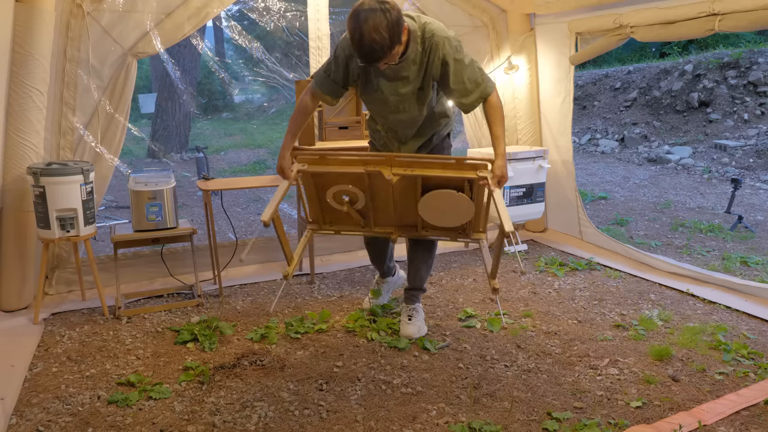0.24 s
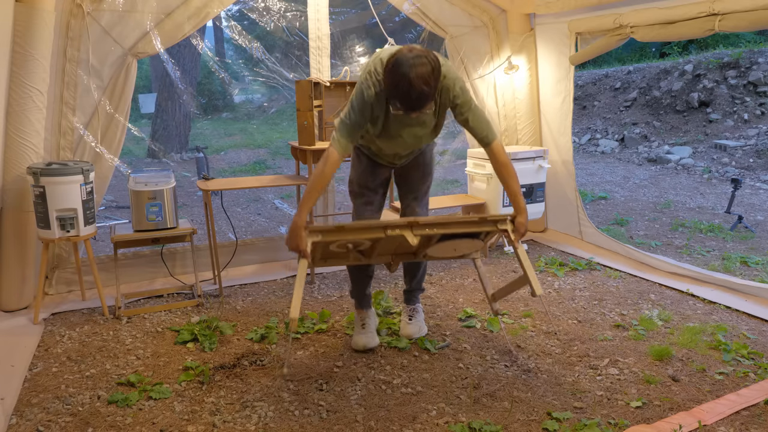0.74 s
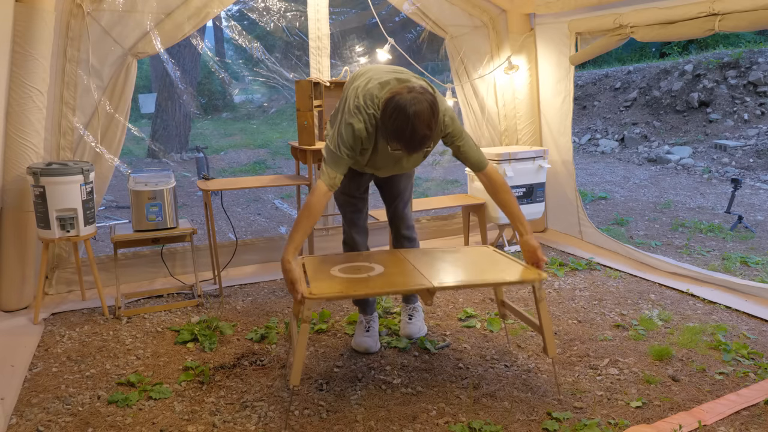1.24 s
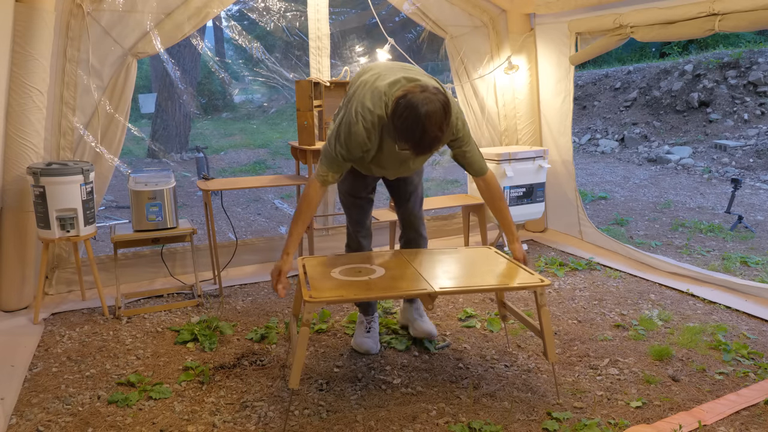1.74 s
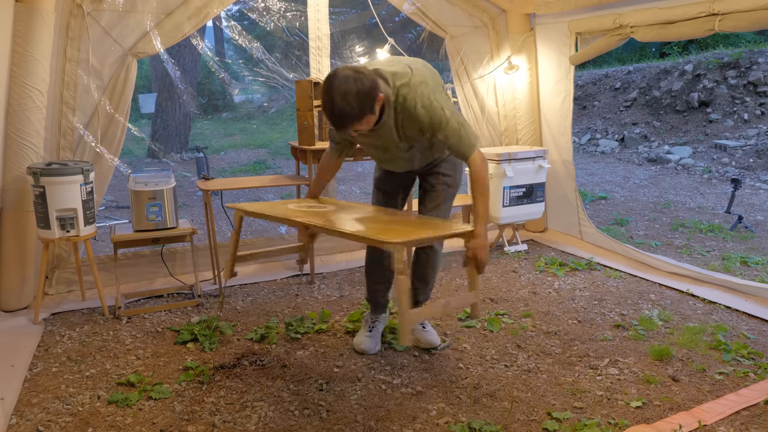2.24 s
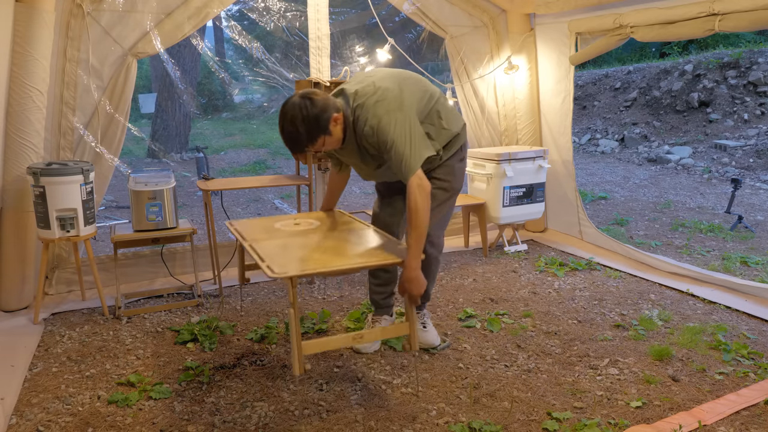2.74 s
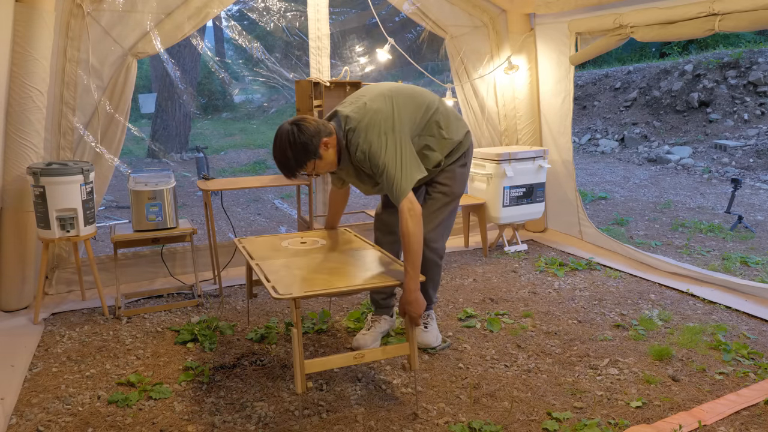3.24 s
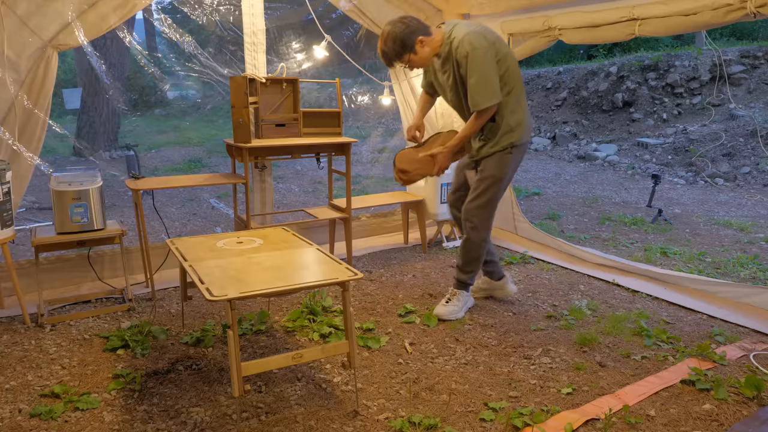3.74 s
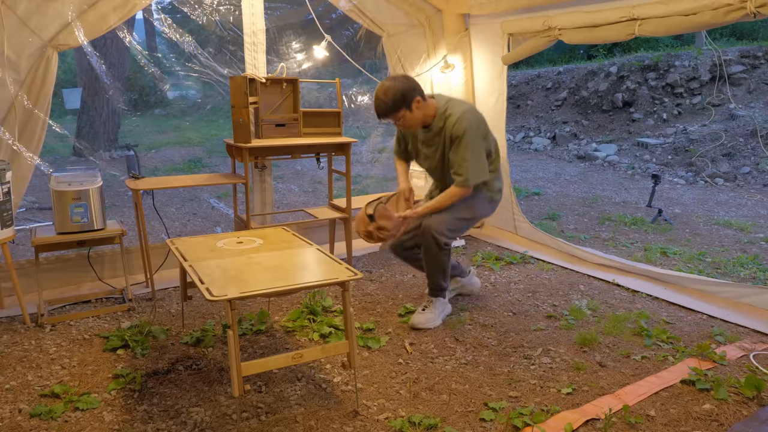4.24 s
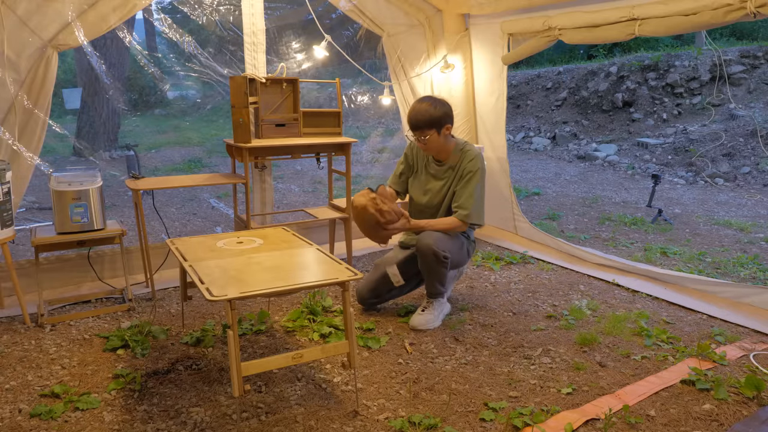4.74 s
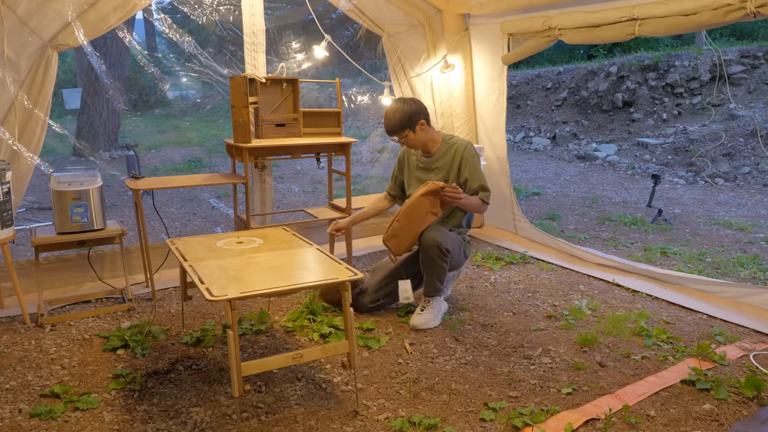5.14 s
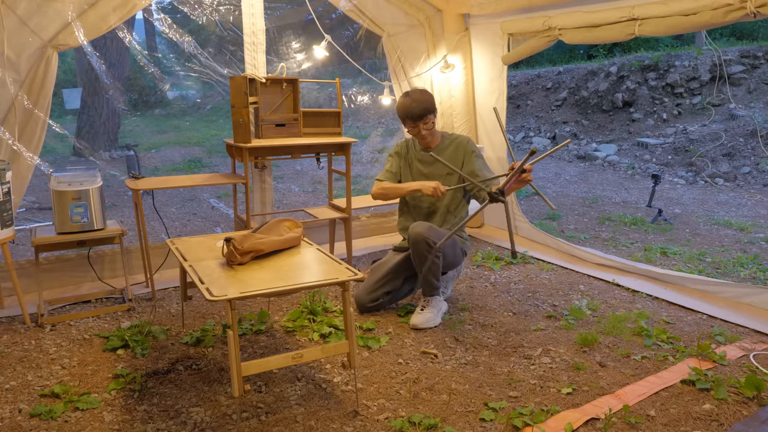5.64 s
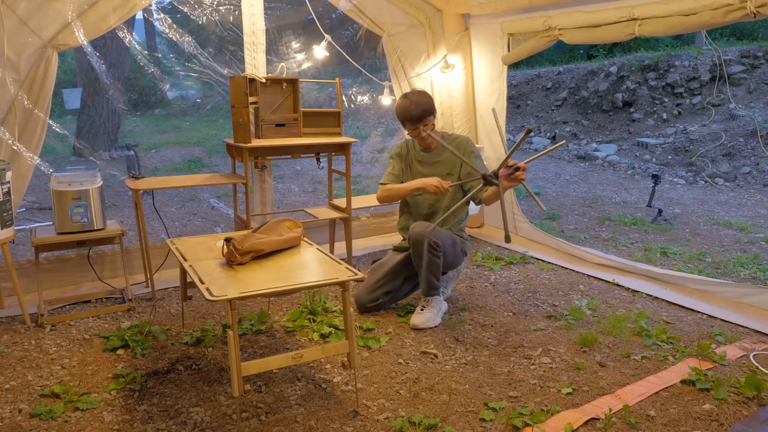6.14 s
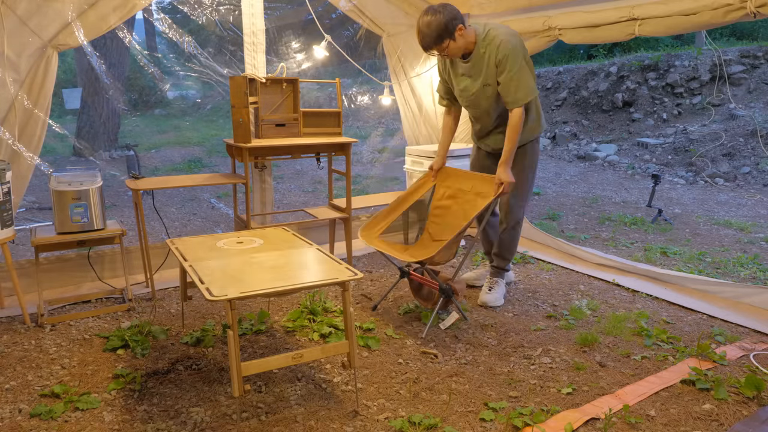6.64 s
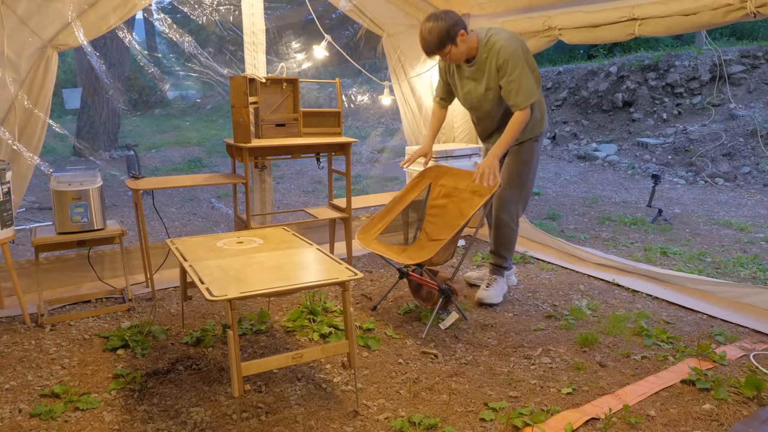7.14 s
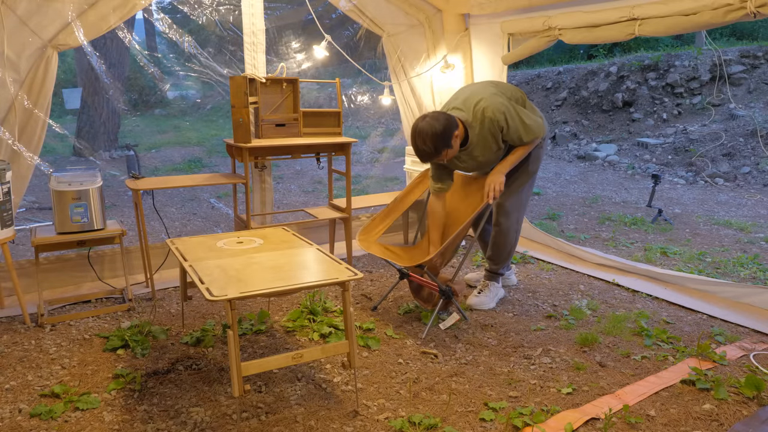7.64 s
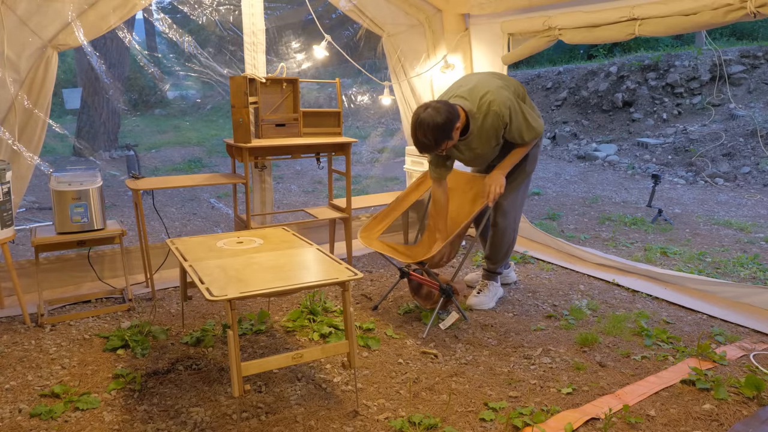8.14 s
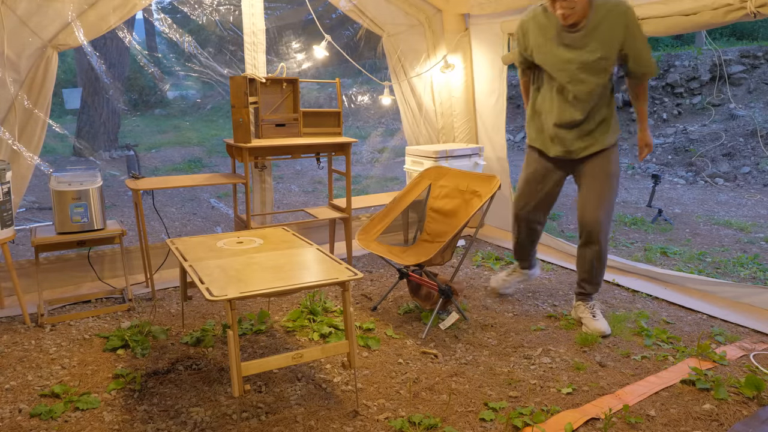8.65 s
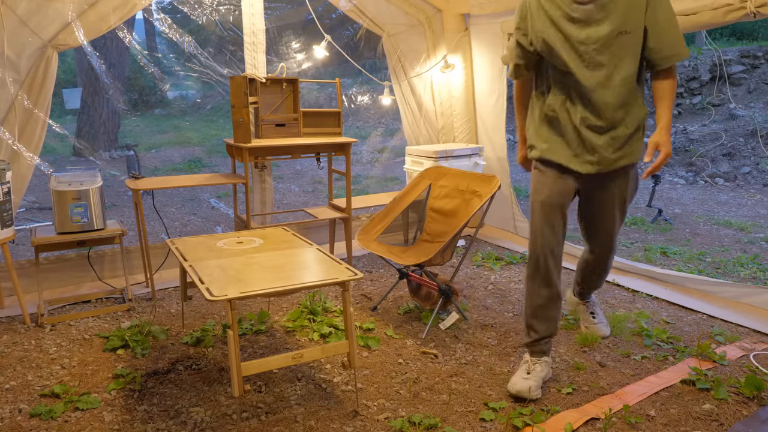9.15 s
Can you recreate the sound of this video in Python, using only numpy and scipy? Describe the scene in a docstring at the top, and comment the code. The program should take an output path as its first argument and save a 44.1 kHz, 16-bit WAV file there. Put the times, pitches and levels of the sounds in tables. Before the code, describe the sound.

Wooden folding table clacks and knocks onto gravel, then a zipper rasps, metal poles clink and snap, and a taut fabric seat gets two thumping pats.

```python
"""A folding wooden table is opened and set down on gravel inside a canvas tent: knocks ring its modes.
A bag is unzipped, tooth by tooth; metal chair poles clink and snap home; the taut seat is patted twice.
A shoe crunches into gravel. Cloth and gravel rustle as shaped noise with the movements, over low thumps.
Behind it lies the steady wash of the outdoors; the canvas adds a short, dull echo to the struck objects."""
import sys
import numpy as np
from scipy import signal
from scipy.io import wavfile

SR = 44100
rng = np.random.default_rng(int(sys.argv[2]) if len(sys.argv) > 2 else 0)


def pcm_store(signal):
    """Save signal as 16-bit PCM."""
    levels = np.round(np.clip(np.atleast_2d(signal), -1, 1) * 32767)
    wavfile.write(sys.argv[1], SR, levels.astype(np.int16).T)


N = 414539

# Spectrum of gravel underfoot. Each row: pitch in Hz, relative density in dB per Hz.
GRAVEL_SPECTRUM = [(50, -44), (120, 1), (250, 0), (500, 3.5), (1000, -2.5), (2000, -15.5), (4000, -39.5)]


def amp(db):
    """Decibels to gain."""
    return 10 ** (np.asarray(db) / 20)


def rms_one(x):
    """Scaled to unit power."""
    return x / np.sqrt(np.mean(x ** 2) + 1e-20)


def in_time(rows):
    """Columns of a curve at every sample."""
    s, *columns = np.transpose(rows)
    return [np.interp(np.arange(N) / SR, s, c) for c in columns]


def at_hz(points, hz):
    """A spectrum or decay curve read on a log-frequency axis."""
    pitches, values = np.transpose(points)
    return np.interp(np.log(hz), np.log(pitches), values)


def drift(rate_hz):
    """Slow chance of spread 1: noise through two equal poles at the given rate."""
    step = 40   # samples between drawn points
    pole = np.exp(-2 * np.pi * rate_hz * step / SR)
    raw = rng.standard_normal(N // step + 2002)
    slow = signal.lfilter([1], [1, -2 * pole, pole * pole], raw)[2000:]
    return np.interp(np.arange(N) / step, np.arange(len(slow)), rms_one(slow))


def bandpass(x, order, low_hz, high_hz):
    """Butterworth band-pass."""
    return signal.sosfilt(signal.butter(order, [low_hz, high_hz], "band", fs=SR, output="sos"), x)


def split(source):
    """Half-octave bands (centre Hz, signal); neighbours come from different rows of the source."""
    edges_hz = 25 * 2 ** np.arange(0, 9.6, .5)
    return [(np.sqrt(low * high), bandpass(source[k % 2], 2, low, high))
            for k, (low, high) in enumerate(zip(edges_hz, edges_hz[1:]))]


def colour(bands, spectrum, patchy_db):
    """Bands weighted by a spectrum, each flickering on its own; rms 1."""
    return rms_one(sum(amp(at_hz(spectrum, hz) + patchy_db * drift(20.6)) * band for hz, band in bands))


def grains(per_s, spread_db, hiss):
    """Two rows of random clicks of uneven size on a bed of hiss."""
    sizes = amp(spread_db * np.minimum(rng.exponential(1, (2, N)), 5))
    sizes = sizes * rng.choice([-1, 1], (2, N))
    clicks = sizes * (rng.random((2, N)) < per_s / SR)
    return rms_one(clicks) + hiss * rng.standard_normal((2, N))


def swells(rows, idle_db):
    """Each gesture climbs 20 dB in its swell time and falls 20 dB in its fade time, over an idle level."""
    t, out = np.arange(N) / SR, np.full(N, amp(idle_db))
    for s, swell, fade, db in rows:
        at = slice(max(int((s - 3 * swell) * SR), 0), int((s + 3 * fade) * SR))
        climbing = (s - t[at]) / max(swell, .002)
        falling = (t[at] - s) / max(fade, .002)
        out[at] += amp(db - 20 * np.maximum(climbing, falling))
    return out


def rustle(effort, per_s, spectrum, lumpy_db, lumps_per_s):
    """Grains on hiss, as loud as the movement."""
    lumps = amp(lumpy_db * drift(lumps_per_s))
    bands = split(grains(per_s, spread_db=3.0, hiss=1.0))
    return effort * lumps * colour(bands, spectrum, patchy_db=2.5)


def touch_db(hz, hardness, favoured_hz, rebound):
    """Hardness tilts the spectrum about 1 kHz, the spot struck favours its pitch, rebounds are duller."""
    favour_db, favour_octaves = 7.5, 0.42
    duller_db, keeps_hz = 1, 497   # each rebound loses this much per octave above this pitch
    tilt = hardness * np.log2(hz / 1000)
    favour = favour_db * np.exp(-.5 * (np.log2(hz / favoured_hz) / favour_octaves) ** 2)
    dulling = rebound * duller_db * np.maximum(np.log2(hz / keeps_hz), 0)
    return tilt + favour - dulling


def blows(events, modes, crack, noise, ring_db, crack_db, rise_ms, swell_cycles, spread, length, rebound_ms):
    """Each touch rings slightly detuned modes and a crack of noise dying band by band; blows may rebound."""
    # How a crack dies, to be scaled by length. Each row: pitch in Hz, 60 dB decay time in seconds.
    crack_t60 = [(100, 0.17), (500, 0.084), (2000, 0.1), (10000, 0.17)]
    first_touch_db, first_touch_ms = 2, 2.6   # extra level at the start of a crack, and its decay time
    longer_per_db = 0.0027   # the crack of a stronger blow lasts slightly longer (share per dB)
    most_touches, faintest_db = 6, 24   # rebounds stop once this much has been lost
    t = np.arange(SR // 6) / SR
    out = np.zeros(N + SR)
    hz, level_db, t60 = np.transpose(modes)
    centres, bands = noise
    luck = rng.standard_normal((len(events), most_touches, 3, len(modes)))
    chance = rng.random((len(events), 2, most_touches))
    first_touch = 1 + amp(first_touch_db) * np.exp(-1000 * t / first_touch_ms)
    end = np.minimum(1, 4 * (1 - t / t[-1]))   # fades out over the last quarter

    def rise(pitch_hz):
        """Low pitches take longer to build up, by a part of a cycle."""
        rise_s = rise_ms / 1000 + swell_cycles / pitch_hz
        return end * (1 - np.exp(-t / rise_s[:, None]))

    ringing = rise(hz) * amp(-60 * t / t60[:, None])
    cracking = rise(centres) * first_touch
    for (s, db, hardness, favoured_hz, loss_db), touches, (gaps, picks) in zip(events, luck, chance):
        crack_s = length * np.exp(longer_per_db * db) * at_hz(crack_t60, centres)
        dying = cracking * amp(-60 * t / crack_s[:, None])
        for k, (strength, detune, phase) in enumerate(touches):
            lost_db = k * abs(loss_db)
            if lost_db > faintest_db:
                break
            force_db = db - lost_db
            pitches = hz * (1 + spread * detune)
            swing = np.sin(2 * np.pi * pitches[:, None] * t + 2 * phase[:, None])
            mode_db = level_db + touch_db(hz, hardness, favoured_hz, k) + 2 * strength
            ring = amp(force_db + ring_db + mode_db) @ (ringing * swing)
            band_db = at_hz(crack, centres) + touch_db(centres, hardness, favoured_hz, k)
            pick = int(picks[k] * (N - len(t)))   # a random stretch of the noise
            burst = amp(force_db + crack_db + band_db) @ (dying * bands[:, pick:pick + len(t)])
            at = int((s + rebound_ms / 1000 * np.sum(.8 + .4 * gaps[:k])) * SR)
            out[at:at + len(t)] += ring + burst
    return out[:N]


def outdoors_wash():
    """Steady wash of the outdoors: noise whose bands flicker a little."""
    # Each row: pitch in Hz, relative density in dB per Hz.
    spectrum = [(15, -36), (25, -7), (394, 1.5), (1230, 2.5), (3520, -11.5), (8140, -15.5), (10400, -82),
                (14000, -57), (16000, -34)]
    return amp(-50) * colour(split(rng.standard_normal((2, N))), spectrum, patchy_db=2.0)


def ground_thumps():
    """Dull rumble of weight shifting on the ground: low noise in swells."""
    # Each row: loudest moment in seconds, swell in seconds, fade in seconds, level in dB.
    shifts = [(0.68, .3, .4, -60), (3.01, 0.13, 0.44, -54), (4.3, 0.46, 0.2, -54), (5.33, .4, .3, -55),
              (9.4, 0.6, .1, -44.5)]
    rumble = bandpass(rng.standard_normal(N), 2, 30, 110)
    return swells(shifts, idle_db=-63.5) * rms_one(rumble)


def gravel_scuffs():
    """Shoes, knees and table legs shifting in the gravel: sparse grains on hiss."""
    # Each row: loudest moment in seconds, swell in seconds, fade in seconds, level in dB.
    scuffs = [(0.32, .05, 0.13, -46), (0.9, .4, 0.35, -43), (1.45, .04, 0.19, -48),
              (1.62, 0.077, 0.24, -52), (1.89, .08, 0.086, -46), (2.37, 0.18, 0.074, -51),
              (2.59, .2, 0.4, -50.5), (3.02, 0.11, 0.18, -39), (3.32, 0.028, 0.054, -50),
              (3.38, 0.018, 0.038, -44), (3.69, 0.087, 0.21, -40), (4.02, 0.067, 0.67, -43),
              (4.78, 0.11, .1, -56), (5.24, 0.11, 0.074, -35), (5.5, 0.037, 0.068, -58), (7.7, 1, .4, -55),
              (9.156, 0.033, .18, -38.5)]
    return rustle(swells(scuffs, idle_db=-54.5), 300, GRAVEL_SPECTRUM, lumpy_db=3.5, lumps_per_s=5.1)


def cloth_rubs():
    """Clothes and canvas brushing: dense grains on hiss."""
    # Each row: loudest moment in seconds, swell in seconds, fade in seconds, level in dB.
    rubs = [(0.45, 0.079, 0.34, -48), (0.66, 0.072, 0.28, -48.5), (0.9, 0.28, 0.45, -49),
            (1.36, .12, 0.089, -41), (1.5, 0.051, 0.077, -34.5), (1.658, 0.042, 0.078, -35.5),
            (1.88, 0.091, 0.11, -44), (2.35, 0.21, 0.22, -48.5), (2.58, 0.12, 0.11, -54),
            (2.85, 0.062, 0.17, -50), (3.02, 0.12, 0.15, -40), (3.39, 0.092, 0.079, -51),
            (3.62, 0.023, 0.18, -53), (3.9, 0.18, .3, -37), (4.27, 0.11, 0.088, -45),
            (4.47, .15, 0.11, -46.5), (4.78, 0.17, 0.11, -43), (5.09, 0.15, 0.17, -43),
            (5.34, .15, 0.078, -29.5), (5.818, .02, .05, -52), (6.05, 0.12, 0.15, -50),
            (6.85, 0.13, 0.046, -53), (7.05, .3, 0.25, -58), (7.35, .04, 0.15, -53),
            (7.72, 0.11, 0.13, -44), (7.89, 0.031, 0.054, -44), (8.26, 0.14, 0.13, -49),
            (8.4, 0.088, 0.017, -38), (8.7, 0.3, 0.19, -55), (9.15, 0.12, 0.28, -45), (9.4, 0.052, .1, -51)]
    # Each row: pitch in Hz, relative density in dB per Hz.
    spectrum = [(470, -29), (800, -6.5), (1150, -6), (1370, -10.5), (1810, -15.5), (2130, -2.5),
                (2440, -12), (12800, -22), (16000, -30.5)]
    return rustle(swells(rubs, idle_db=-67), 1500, spectrum, lumpy_db=1.0, lumps_per_s=9.1)


def shoe_crunch(noise):
    """A shoe crunching into gravel: briefly ringing stones and a short crack of noise."""
    # Each row: start in seconds, strength in dB, hardness in dB per octave, favoured pitch in Hz,
    # loss per rebound in dB.
    crunches = [(9.11, -27, -2, 420, 7), (9.148, -20.5, 2.5, 430, 2.5), (9.208, -20.5, 1.5, 465, 4)]
    # Ringing of the stones. Each row: pitch in Hz, relative level in dB, 60 dB decay time in seconds.
    stones = [(336, 4, .03), (600, -10, 0.027), (1023, 10, 0.027), (1510, -12, .02)]
    return blows(crunches, stones, GRAVEL_SPECTRUM, noise, ring_db=-15, crack_db=4, rise_ms=0.45,
                 swell_cycles=0.36, spread=0.085, length=0.21, rebound_ms=14)


def seat_squeak():
    """The seat fabric springing back: a fluttering tone that slides down and settles."""
    # Each row: loudest moment in seconds, swell in seconds, fade in seconds, level in dB.
    springing = [(7.905, .045, .07, -33)]
    loudest_hz, sag_hz_per_s = 1950, 20000   # pitch at the loudest moment, and its slide
    settles_hz, highest_hz = 1780, 2500   # limits of the slide, before the pitch flutter
    since_loudest = np.arange(N) / SR - springing[0][0]
    hz = np.clip(loudest_hz - sag_hz_per_s * since_loudest, settles_hz, highest_hz)
    level = swells(springing, idle_db=-150) * amp(4.5 * drift(170))
    fluttering_hz = hz * (1 + 0.061 * drift(140))
    return level * np.sin(2 * np.pi * np.cumsum(fluttering_hz) / SR)


def bag_zipper(uneven_db, weak_db):
    """The slider strikes two rows of teeth in turn; pulled slowly, it stutters and one row sounds weaker."""
    # The pull on the slider. Each row: time in seconds, teeth per second, relative level in dB.
    pull = [(3.66, 327, -43), (3.72, 300, -28), (3.76, 370, -24), (3.80, 350, -26.5), (3.856, 680, -27.5),
            (3.9, 700, -23), (3.93, 760, -33), (3.96, 810, -24.5), (4.02, 890, -36)]
    # Colour of the ticks. Each row: pitch in Hz, gain in dB.
    tick_colour = [(100, 1), (200, 9.5), (400, 18), (800, -2), (1400, -12), (2400, -8.5), (3500, -14),
                   (6000, -21), (15000, -26.5)]
    even_teeth_per_s = 560   # at this speed and above there is no stutter
    slow_jitter, fast_jitter = .2, .01   # share of the speed
    teeth, pull_db = in_time(pull)
    t = np.arange(N) / SR
    slowness = np.clip(2 * (1 - teeth / even_teeth_per_s), 0, 1)
    speed = teeth * (1 + (fast_jitter + slow_jitter * slowness) * drift(60))
    tooth = np.floor(np.cumsum(speed) / SR)
    tick_db = uneven_db * drift(97) - weak_db * slowness * (tooth % 2)
    ticks = np.diff(tooth, prepend=0) * np.sqrt(SR / even_teeth_per_s) * amp(tick_db)
    ticks = ticks * amp(pull_db) * (t > pull[0][0]) * (t < pull[-1][0])
    bands = split([ticks + 1e-18, ticks + 1e-18])
    # neighbouring bands have opposite signs
    return sum(amp(at_hz(tick_colour, hz)) * band * (-1) ** k for k, (hz, band) in enumerate(bands))


def seat_pats(noise):
    """Hands on the taut seat and the bag: low fabric modes and a soft crack."""
    # Each row: start in seconds, strength in dB, hardness in dB per octave, favoured pitch in Hz,
    # loss per rebound in dB (sign ignored).
    pats = [(4.004, -24, 1.5, 376.6, 3), (4.035, -23, 1.5, 823, 5), (4.143, -25, 0, 418, 33),
            (4.204, -31, 0, 646, -4), (4.251, -19.5, 3.5, 400, 3), (4.358, -31, 0.5, 900, 30),
            (4.452, -27, 3, 523, 8), (4.535, -26, 0.5, 781, 30), (6.707, -35, 1, 294, 3),
            (7.182, -35, -0.5, 848, 30), (7.659, -10, 2.5, 790, 33), (7.664, 0, 3, 240, 8),
            (7.865, -34.5, 4.5, 900, 9), (7.918, -35, 1, 260, 7), (8.086, -12.5, 5, 850, 28),
            (8.091, -2.5, 1, 290, 5), (8.168, -33.5, 5.5, 1430, 4), (8.651, -44, 9.5, 388, 1)]
    # Ringing of the seat. Each row: pitch in Hz, relative level in dB, 60 dB decay time in seconds.
    seat = [(135, -5, .11), (178, -4, .11), (262, 0, .11), (355, -8, .09), (560, -8, .08), (655, -7, .08),
            (760, -9, .07), (1005, -11, .06), (1340, -14, .06)]
    # Crack of the contact. Each row: pitch in Hz, relative density in dB per Hz.
    crack = [(29, -46), (50, 0), (285, 0), (449, -2.5), (941, -4.5), (1630, -13), (2820, -19.5),
             (3940, -22.5), (5250, -23.5), (15000, -47)]
    return blows(pats, seat, crack, noise, ring_db=-16, crack_db=10.0, rise_ms=0.92,
                 swell_cycles=0.2, spread=0.046, length=0.52, rebound_ms=12)


def pole_snap(noise):
    """A pole snapping home: its socket rings under a bright crack."""
    # Each row: start in seconds, strength in dB, hardness in dB per octave, favoured pitch in Hz,
    # loss per rebound in dB.
    snaps = [(6.085, -5, 0, 2500, 9)]
    # Ringing of the socket. Each row: pitch in Hz, relative level in dB, 60 dB decay time in seconds.
    socket = [(2000, -2, .03), (2850, -3, .035), (3060, 0, 0.04), (3420, -3, .03), (4860, -12, .03),
              (5700, -4, 0.04), (7400, -12, .03), (10100, -8, 0.06), (12700, -8, .03)]
    # Crack of the contact. Each row: pitch in Hz, relative density in dB per Hz.
    crack = [(500, -17), (1000, -10), (2000, -15), (2450, -15), (3100, -9), (4000, -20), (5600, -10.5),
             (10000, -19), (15000, -19)]
    return blows(snaps, socket, crack, noise, ring_db=-20.5, crack_db=5, rise_ms=0.75,
                 swell_cycles=0.33, spread=0.025, length=0.35, rebound_ms=8)


def pole_clinks(noise):
    """Metal poles touching: high modes and a crack of noise, often rebounding."""
    # Each row: start in seconds, strength in dB, hardness in dB per octave, favoured pitch in Hz,
    # loss per rebound in dB (sign ignored).
    clinks = [(4.0736, -29.5, -1.5, 3410, 30), (4.144, -32, 0.5, 5200, 32), (4.2328, -31, 2, 5240, 6),
              (4.4543, -31, 0, 4800, 20), (4.4894, -38.5, 1.5, 15700, 8), (4.5251, -31, -0.5, 1590, 30),
              (4.7102, -26.5, -3, 4670, 1), (5.1063, -13, -3, 1870, 7), (5.1292, -19.5, 1, 3460, 22),
              (5.2056, -22, -3.5, 5370, 5), (5.2334, -11, 0, 1580, 20), (5.242, -7.5, -1, 4200, 3.5),
              (5.2624, -12.5, 1, 5170, 22), (5.3186, -20, -5, 4380, 20), (5.3258, -12.5, -0.5, 4670, 1),
              (5.4094, -27.5, -2.5, 4380, 20), (5.4919, -27.5, -3, 4300, 4), (5.5358, -28.5, -3, 2060, 4),
              (5.9045, -41, 3.5, 3300, 18), (6.0087, -43.5, 1.5, 6850, 15), (6.0402, -37, 1.5, 7090, -1)]
    # Ringing of the poles. Each row: pitch in Hz, relative level in dB, 60 dB decay time in seconds.
    poles = [(3410, 0, 0.032), (4610, 3, 0.055), (4854, 9.5, 0.027), (5100, 8.5, 0.049), (6560, -16, .04),
             (7700, -3, .03), (7960, 5, 0.062), (9900, -8, 0.06), (13300, 0, .05)]
    # Crack of the contact. Each row: pitch in Hz, relative density in dB per Hz.
    crack = [(180, -26), (300, -11.5), (1090, -10), (1250, -8.5), (1970, -7), (2210, -6), (3980, -10),
             (4850, -9.5), (11000, -21), (15000, -26.5)]
    return blows(clinks, poles, crack, noise, ring_db=-18.5, crack_db=3.0, rise_ms=1.7,
                 swell_cycles=0.3, spread=0.0446, length=0.71, rebound_ms=13)


def table_knocks(noise):
    """Table legs and top knocking: damped wooden modes and a crack of noise."""
    # Each row: start in seconds, strength in dB, hardness in dB per octave, favoured pitch in Hz,
    # loss per rebound in dB.
    knocks = [(0.737, -24, -2, 400, 30), (0.743, -16.5, 1.5, 2190, 8), (0.763, -16, 3.5, 400, 9),
              (0.812, -19, 0, 393, 30), (0.826, -1.5, 0, 2970, 23.5), (0.832, -1, -1.5, 484, 12.5),
              (1.049, -21.5, 2.5, 5840, 20), (1.138, -38.5, 6, 8000, 30), (1.318, -30, 3.5, 202, 30),
              (1.326, -10, -1.5, 606, 36), (1.343, -9, -3, 423, 6), (1.399, -20.5, -0.5, 202, 6),
              (1.43, -31, 1.5, 2300, 30), (1.468, -33, 4.5, 1980, 1), (1.489, -25, 4, 1900, 0),
              (1.544, -22.5, 2, 1880, 30), (1.57, -25, 2.5, 1840, 22), (1.619, -26, 1.5, 890, 1.5),
              (1.64, -24, 4, 1870, 1), (1.684, -31, 5.5, 2090, 30), (1.889, -32, -2, 272, 30),
              (2.001, -37.5, 3, 1160, 30), (2.209, -32, -2, 840, 30), (2.594, -37.5, 3, 1030, 10),
              (2.805, -33, -2, 724, 2), (2.951, -17, 1, 2120, 32), (2.962, -9, 1, 265, 2),
              (2.985, -10.5, -1, 436, 2.5), (3.05, -23.5, 0, 437, 3), (3.108, -26, 2.5, 1140, 15)]
    # Ringing of the table. Each row: pitch in Hz, relative level in dB, 60 dB decay time in seconds.
    wood = [(197.1, -8.5, 0.3), (255, 0.5, 0.082), (454, -9, 0.22), (439, -3, 0.079), (607, -15, 0.17),
            (700, -39, 0.046), (834, 2, 0.075), (1200, -32, 0.032), (1860, -13, .04), (2050, -5, 0.026),
            (2344, 3, 0.015), (2930, -19, 0.036), (3290, 2, 0.025), (4300, -25, 0.028)]
    # Crack of the contact. Each row: pitch in Hz, relative density in dB per Hz.
    crack = [(53, -46), (90, -29), (194, -19), (448, -13.5), (852, -13), (1420, -13), (2760, -23),
             (3650, -25.5), (7890, -29.5), (15000, -70)]
    return blows(knocks, wood, crack, noise, ring_db=-19, crack_db=12, rise_ms=0.36,
                 swell_cycles=0.17, spread=0.019, length=0.53, rebound_ms=14)


def tent(x):
    """Canvas lets the bass out and sends back a short, dull, dense echo."""
    t60_s, echo_db, thin_hz, dull_hz = 0.14, -10, 500, 7000
    t = np.arange(SR // 2) / SR
    tail = rng.standard_normal(len(t)) * amp(-60 * t / t60_s) * (t > .003)
    tail = bandpass(tail, 1, thin_hz, dull_hz)
    tail = tail / np.sqrt(np.sum(tail ** 2))
    return x + amp(echo_db) * signal.fftconvolve(x, tail)[:N]


def scene():
    """All sources in and around the tent, heard by one microphone."""
    noise = [np.array(part) for part in zip(*split(rng.standard_normal((2, N))))]   # centres Hz, bands
    background = outdoors_wash() + ground_thumps() + gravel_scuffs() + cloth_rubs()
    near = shoe_crunch(noise) + seat_squeak() + bag_zipper(uneven_db=2, weak_db=9.5)
    near = near + pole_snap(noise) + pole_clinks(noise) + table_knocks(noise)
    # small stiff objects radiate no deep bass; the seat keeps its own
    near = signal.sosfilt(signal.butter(4, 120, "high", fs=SR, output="sos"), near)
    return (tent(near + seat_pats(noise)) + background)[None]


def record(dry):
    """The microphone chain rounds the loudest peaks and cuts the top steeply."""
    cutoff_hz, ceiling = 15850, 1.2
    rounded = ceiling * np.tanh(dry / ceiling)
    return signal.sosfilt(signal.ellip(14, .5, 90, cutoff_hz, fs=SR, output="sos"), rounded)


dry = scene()
out = record(dry)
pcm_store(out)
```